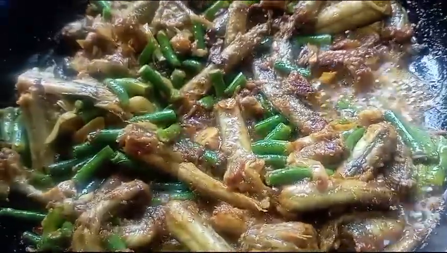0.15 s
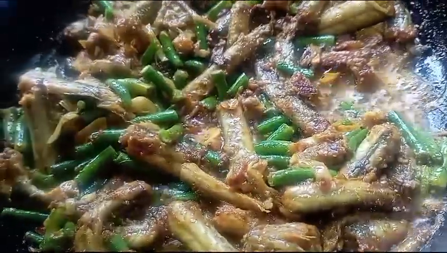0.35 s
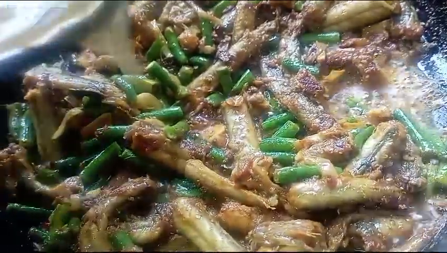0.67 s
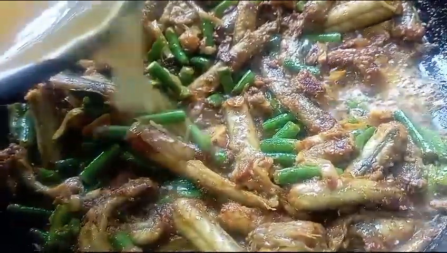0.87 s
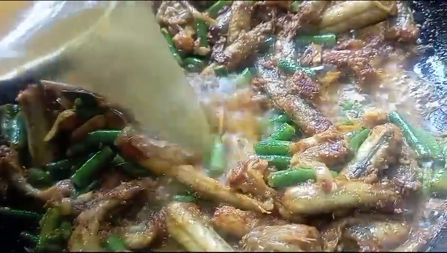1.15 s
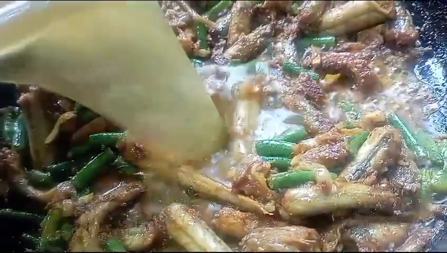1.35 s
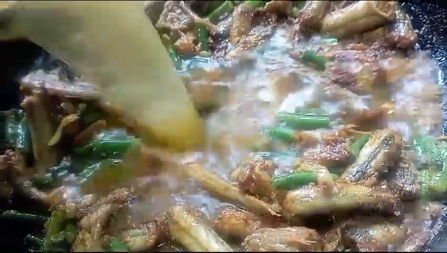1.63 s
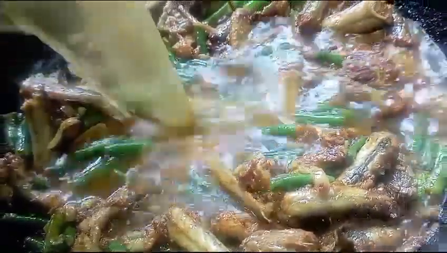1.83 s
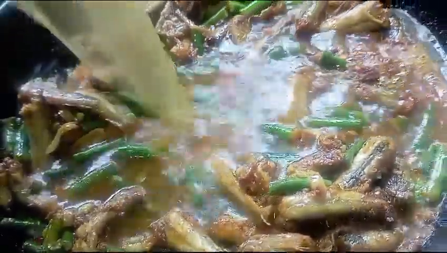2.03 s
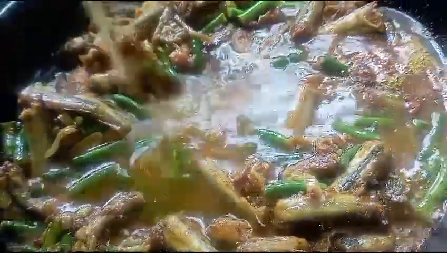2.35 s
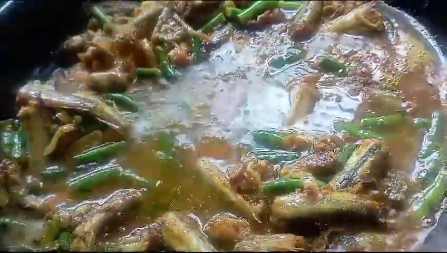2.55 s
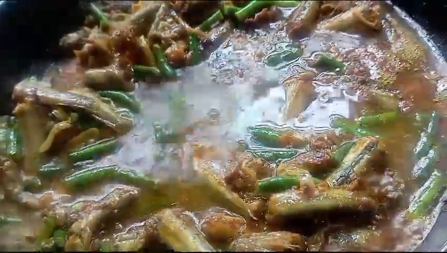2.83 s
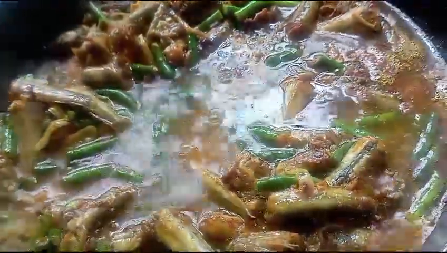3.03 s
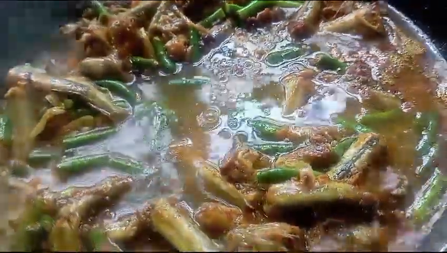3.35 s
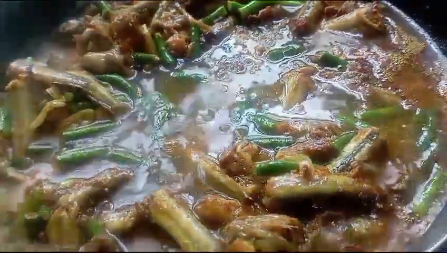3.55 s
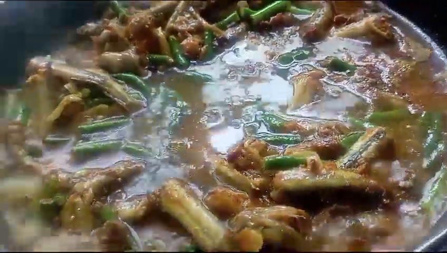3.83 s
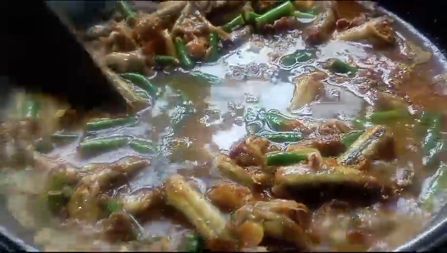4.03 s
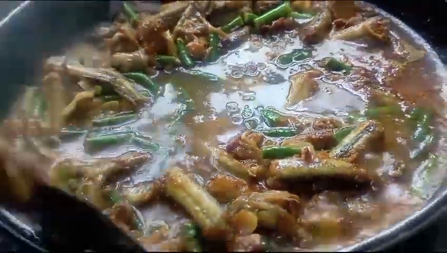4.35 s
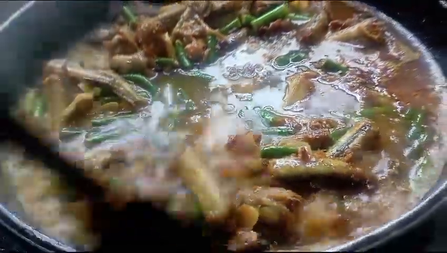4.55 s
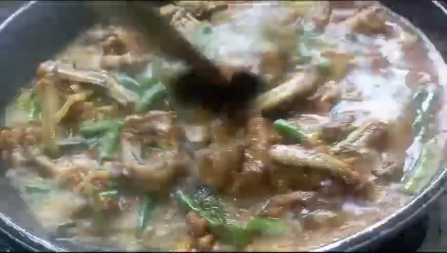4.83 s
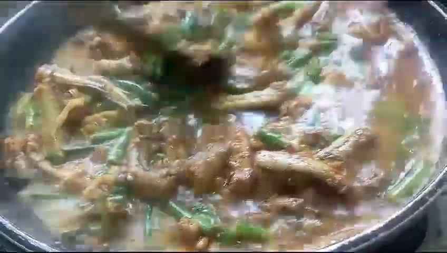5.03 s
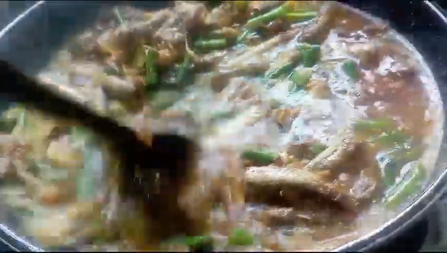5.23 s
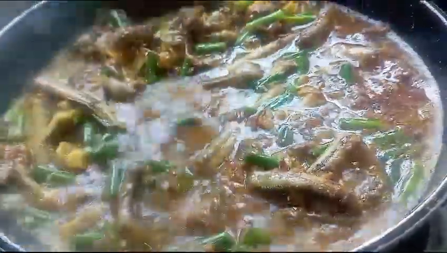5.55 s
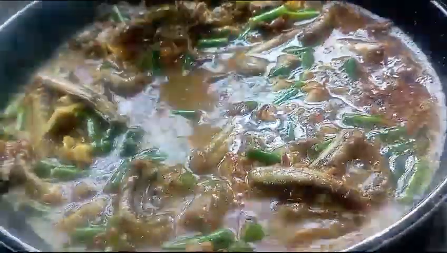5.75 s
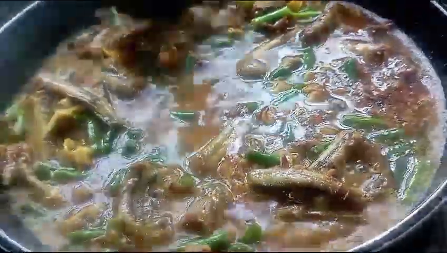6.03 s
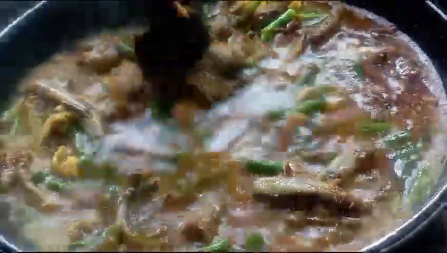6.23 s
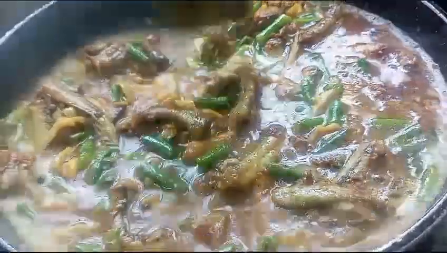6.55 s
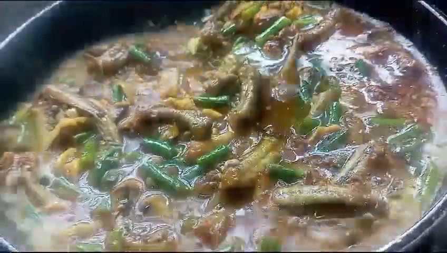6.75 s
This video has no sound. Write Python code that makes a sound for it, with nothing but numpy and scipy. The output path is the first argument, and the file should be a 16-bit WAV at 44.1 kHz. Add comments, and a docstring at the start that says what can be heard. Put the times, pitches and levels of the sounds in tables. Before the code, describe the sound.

Sparse sharp crackles of hot fat in a pan, then poured liquid erupts into a dense, bright sizzle with thumping splatters and light spatula bumps.

```python
"""A kitchen stove, with a two-port microphone just above a pan in which fish curry fries.
Sparse crackling in hot fat swells to a dense sizzle of random bubble bursts when liquid is poured in.
Flying droplets strike the nearer left port, which faces the pan and is brightest near 10 kHz; the right
port faces away and is strongest around 3-4 kHz. Sauce simmers and air in the pan rings, both driven by bursts.
Later a spatula drags over the pan in stick-slip bumps; filtered noise makes the burner rumble below."""
import sys
import numpy as np
from scipy import signal
from scipy.fft import rfft, irfft
from scipy.io import wavfile

SR = 44100
rng = np.random.default_rng(int(sys.argv[2]) if len(sys.argv) > 2 else 0)


def generate_wav(signal):
    """Clip the signal to [-1, 1] and save it as 16-bit WAV at the path in sys.argv[1]."""
    frames = np.transpose(np.atleast_2d(signal))
    scaled = np.clip(frames, -1, 1) * 32767
    pcm = np.round(scaled).astype(np.int16)
    wavfile.write(sys.argv[1], SR, pcm)


N = 303829
TIME = np.arange(N) / SR


def from_db(db):
    """Decibels to amplitude gain."""
    return 10 ** (np.asarray(db) / 20)


def rms_one(x):
    """Scale to unit rms."""
    return x / np.sqrt(np.mean(x ** 2) + 1e-20)


def in_time(rows):
    """Interpolate each column of a curve at every sample."""
    seconds, *columns = np.transpose(rows)
    return [np.interp(TIME, seconds, column) for column in columns]


def cut(x, hz, kind, order=2):
    """Butterworth low- or high-pass."""
    sos = signal.butter(order, min(hz, .45 * SR), kind, fs=SR, output="sos")
    return signal.sosfilt(sos, x + 1e-18)


def drift(rate_hz):
    """Slow random wander of spread 1: noise through two equal poles, made at every 40th sample."""
    step = 40
    r = np.exp(-2 * np.pi * rate_hz * step / SR)
    noise = rng.standard_normal(N // step + 2002)
    slow = signal.lfilter([1], [1, -2 * r, r * r], noise)[2000:]   # drop the filter's start
    return np.interp(np.arange(N) / step, np.arange(len(slow)), rms_one(slow))


def convolve(x, response):
    """Pass a sound through an impulse response."""
    return signal.oaconvolve(x, response)[:N]


def colour(x, spectrum, size=4096):
    """Causal (minimum-phase) filter that follows a spectrum of (Hz, dB) rows."""
    hz, db = np.transpose(spectrum)
    log_bins = np.log(np.fft.rfftfreq(size, 1 / SR) + 1)
    log_gain = np.log(from_db(np.interp(log_bins, np.log(hz), db)))
    # folding the cepstrum onto positive times gives minimum phase
    cepstrum = irfft(log_gain)[:size // 2]
    cepstrum[1:] *= 2
    return convolve(x, irfft(np.exp(rfft(cepstrum, size))))


def clicks(rows):
    """One single-sample click for each (seconds, dB) row."""
    out = np.zeros(N)
    for s, db in rows:
        out[round(s * SR)] += from_db(db)
    return out


def echoes(x, t60):
    """Dense reflections with the energy of the sound itself: noise under its decaying energy."""
    keep = from_db(-120 / (t60 * SR))
    energy = signal.lfilter([0, 1 - keep], [1, -keep], x ** 2 + 1e-18)
    return np.sqrt(energy) * rng.standard_normal(N)


def paths(x, left_wall_db, left_room_db, right_direct_db, right_wall_db, right_room_db, lag_s=.00036):
    """The left port hears bursts directly; the right a little later, mostly by way of pan wall and kitchen."""
    kitchen_t60 = 0.21
    left = x + from_db(left_wall_db) * echoes(x, t60=.005)
    left = left + from_db(left_room_db) * echoes(x, kitchen_t60)
    late = np.interp(TIME - lag_s, TIME, x)
    right = from_db(right_direct_db) * late + from_db(right_wall_db) * echoes(late, t60=0.0096)
    right = right + from_db(right_room_db) * echoes(late, kitchen_t60)
    return np.array([left, right])


# Colour of the port that faces the pan. Each row: frequency in Hz, gain in dB.
LEFT_PORT_COLOUR = [(900, -46.5), (1300, -19.5), (1600, -19), (2300, -13.5), (3000, -14.6), (4100, -11),
                    (5500, -11), (7000, -9), (8500, -4.5), (9400, -0.5), (10100, 1.7), (11000, -1.5),
                    (12000, -4.5), (13500, -8.5), (15500, -11)]
# Colour of the port that faces away. Each row: frequency in Hz, gain in dB.
RIGHT_PORT_COLOUR = [(900, -29.5), (1300, -23.2), (1550, -25.5), (1900, -16.5), (2200, -15.5),
                     (2450, -11.5), (2750, -2), (3300, -3), (3650, -3.5), (3950, -5), (4400, -2.5),
                     (5200, -5), (6000, -7), (9500, -16), (15500, -18.5)]


def ports(both):
    """Each microphone port adds its own resonances."""
    return np.array([colour(both[0], LEFT_PORT_COLOUR), colour(both[1], RIGHT_PORT_COLOUR)])


def pair(make, likeness, balance_db):
    """Two channels of a diffuse sound that are partly alike, from independent mid and side."""
    alike = np.clip(likeness, -1, 1)
    mid = np.sqrt((1 + alike) / 2) * make()
    side = np.sqrt((1 - alike) / 2) * make()
    return np.array([(mid + side) * from_db(balance_db / 2), (mid - side) * from_db(-balance_db / 2)])


def bursts(per_s, spread_db, clump_db, largest=3.73):
    """Tiny bubbles burst at random, in clumps; most are weak, a few strong."""
    born = rng.random(N) < per_s * from_db(clump_db * drift(25)) / SR
    sizes = from_db(spread_db * np.minimum(rng.exponential(1, N), largest))
    signs = rng.choice([-1, 1], N)
    # dividing by the rate keeps the power even while the rate changes
    return rms_one(born * sizes * signs / np.sqrt(per_s))


# Moment the liquid reaches the hot metal, and time constant of its spreading, in seconds.
POUR_S, SPREAD_S = 1.965, .42


def since_pour():
    """Seconds since the liquid reached the metal; zero before."""
    return np.maximum(TIME - POUR_S, 0)


def wetted(rise_s):
    """Share, from 0 to 1, that builds up exponentially after the pour."""
    return 1 - np.exp(-since_pour() / rise_s)


def blend_db(dry_db, wet_db, rise_s):
    """The power of the wetted pan takes over from that of the dry pan."""
    share = wetted(rise_s)
    power = (1 - share) * from_db(dry_db) ** 2 + share * from_db(wet_db) ** 2
    return 10 * np.log10(power)


# The wetted metal fries loudly and cools slowly; levels here are relative.
FRY_DB, COOLING_DB_PER_S = -33.5, .27
# The first liquid flashes to steam: extra fizz that settles.
FIZZ_DB, FLASH_DB, FLASH_S = -33.3, 9.7, 1.6
# Time constants of the build-up: fizz grows faster than frying.
FRY_RISE_S, FIZZ_RISE_S = .34, .28
# Close over the pan before the liquid spreads. Each row: time in seconds, then relative levels in dB of
# the frying, the fine fizz and the simmer.
DRY_PAN_LEVELS = [(0, -41.5, -37, -60), (0.55, -42.6, -41.5, -60.6), (1.17, -44.2, -43.3, -59.3),
                  (1.8, -43, -36.7, -56.8)]
# Sauce washes over bare metal and the sizzle swells. Each row: centre in seconds, half width in seconds,
# added frying in dB, added fizz in dB.
SIZZLE_SURGES = [(2.055, .04, 2.6, .8), (2.32, .06, .3, 1.5), (3.65, .2, .3, 2.3), (5.3, .35, -.2, 3.1),
                 (6.55, .1, .3, 1)]


def heat():
    """Levels of frying and fizz: both leap at the pour, then settle, and change with each surge."""
    dry_fry_db, dry_fizz_db, _ = in_time(DRY_PAN_LEVELS)
    wet_fry_db = FRY_DB - COOLING_DB_PER_S * since_pour()
    wet_fizz_db = FIZZ_DB + FLASH_DB * np.exp(-since_pour() / FLASH_S)
    fry_db = blend_db(dry_fry_db, wet_fry_db, FRY_RISE_S)
    fizz_db = blend_db(dry_fizz_db, wet_fizz_db, FIZZ_RISE_S)
    for s, width_s, more_fry_db, more_fizz_db in SIZZLE_SURGES:
        swell = np.exp(-((TIME - s) / width_s) ** 2)
        fry_db = fry_db + more_fry_db * swell
        fizz_db = fizz_db + more_fizz_db * swell
    return fry_db, fizz_db


# Base burst rates in the dry pan and under liquid, which each source scales; relative level of the sauce.
DRY_RATE, WET_RATE, WET_SIMMER_DB = 600, 8200, -48.9
# Pitch of the commonest bubbles in fat, fresh liquid and heated sauce; time constant of heating through.
FAT_HZ, FRESH_HZ, HEATED_HZ, HEATING_S = 4400, 5600, 2500, 2.1


def liquid():
    """Burst rate, simmer level and bubble pitch: bubbles multiply as liquid spreads and grow as it heats."""
    per_s = DRY_RATE + (WET_RATE - DRY_RATE) * wetted(SPREAD_S)
    *_, dry_simmer_db = in_time(DRY_PAN_LEVELS)
    wet_simmer_db = WET_SIMMER_DB - COOLING_DB_PER_S * since_pour()
    simmer_db = blend_db(dry_simmer_db, wet_simmer_db, SPREAD_S)
    sauce_hz = HEATED_HZ + (FRESH_HZ - HEATED_HZ) * np.exp(-since_pour() / HEATING_S)
    return per_s, simmer_db, np.where(TIME < POUR_S, FAT_HZ, sauce_hz)


# The burner below the pan, as it reaches the microphone. Each row: frequency in Hz, relative level in dB.
BURNER_COLOUR = [(25, -42), (50, -27), (75, -23), (98, -3.5), (118, -12.5), (140, 3), (165, -7.5),
                 (188, 0.5), (225, -8), (300, -7.5), (420, -20.5), (900, -17), (2000, -35)]


def burner():
    """Steady rumble of the stove: low coloured noise, nearly alike at both ports."""
    def rumble():
        return rms_one(colour(rng.standard_normal(N), BURNER_COLOUR))
    return from_db(-55.5) * pair(rumble, likeness=0.97, balance_db=-.3)


# The body of the sauce, heard from above. Each row: frequency in Hz, relative level in dB.
SIMMER_COLOUR = [(90, -22.5), (170, -5), (260, -0.5), (370, -3), (490, 3), (650, -3), (850, 0.5), (950, -9),
                 (1250, -10.5), (1600, -7), (2600, -39)]


def simmer(per_s, simmer_db):
    """Soft, low bursts in the body of the sauce."""
    def blips():
        return rms_one(colour(bursts(per_s / 2, spread_db=2.5, clump_db=2.5), SIMMER_COLOUR))
    return from_db(simmer_db) * pair(blips, likeness=0.53, balance_db=2.5)


# The air held in the pan, under the microphone. Each row: frequency in Hz, bandwidth in Hz, relative level in dB.
PAN_AIR_MODES = [(1055, 120, -8), (1495, 97, -6), (1913, 190, -2), (2624, 130, 0.5), (3007, 75, -1),
                 (3550, 70, -7.5), (4380, 160, -1)]


def pan_air(per_s, fry_db):
    """Bursts set the air in the pan ringing; the two ports lie on opposite sides of its swing."""
    ringing = 0
    for hz, width_hz, db in PAN_AIR_MODES:
        r = np.exp(-np.pi * width_hz / SR)
        resonator = [1, -2 * r * np.cos(2 * np.pi * hz / SR), r * r]
        drive = bursts(per_s * 2, spread_db=4.0, clump_db=2.0)
        ringing = ringing + from_db(db) * rms_one(signal.lfilter([1, 0, -1], resonator, drive))
    ringing = ringing * from_db(fry_db - 13.5)
    return np.array([-.9 * cut(ringing, 2920, "low"), ringing])


# While the spatula drags, it sticks and slips at this interval, with this random spread.
SLIP_S, SLIP_JITTER_S = .0172, .0012
# The spatula drags over the pan under the sauce. Each row: start in seconds, relative level in dB,
# length in seconds.
SPATULA_DRAGS = [(4.847, -33, .01), (6.019, -29.5, .075), (6.136, -33, .01), (6.2, -39, .14)]
# The loaded pan, struck from inside. Each row: frequency in Hz, relative level in dB, 60 dB decay in seconds.
LOADED_PAN_MODES = [(236, -7, .05), (340, -11, .04), (488, -7, 0.074), (564, -7, 0.075), (650, -9, .045),
                    (730, -5, 0.03)]


def spatula():
    """Every slip bumps the damped pan and rings each mode with a strength of its own."""
    bumps = []
    for s, db, length_s in SPATULA_DRAGS:
        for delay in np.arange(0, length_s, SLIP_S):
            bumps.append((s + delay + rng.normal(0, SLIP_JITTER_S), db))
    out = np.zeros(N)
    for k, (hz, db, t60) in enumerate(LOADED_PAN_MODES):
        t = TIME[:int(t60 * SR)]
        blows = clicks([(s, level + rng.normal(0, 1.7)) for s, level in bumps])
        ring = from_db(db - 60 * t / t60) * np.sin(2 * np.pi * hz * t)
        out += convolve(blows, (-1) ** k * ring)   # neighbouring modes start in opposite directions
    return from_db([[-4], [-8]]) * cut(out, 200, "high")


# Fine drops fly at the pour and die down.
MIST_DB, MIST_FADE_DB_PER_S = -45, 4.8


def mist(mist_db):
    """Much smaller drops patter on the left port as low, random taps."""
    taps = bursts(90., spread_db=3.0, clump_db=2.0, largest=3.0)
    patter = cut(cut(taps, 67, "high", order=3), 330, "low", order=1)
    return np.array([rms_one(patter) * from_db(mist_db), np.zeros(N)])


# Droplets that strike the left port. Each row: start in seconds, thump peak in dB, push time in seconds,
# relative splash level in dB.
PORT_DROPLETS = [(2.0884, -24.5, .0003, -15), (2.148, -22.5, .00018, -2.5), (2.2133, -23, .0002, -6),
                 (2.2764, -21, .00016, -8), (2.3116, -10, .00066, -10), (2.3703, -25, .00018, -13),
                 (2.4558, -4.1, .00096, -18), (2.592, -26.5, .00026, -18), (2.8762, -21, .00046, -16),
                 (2.9077, -8.3, .0013, -20)]


def droplets():
    """Each drop pushes air into the port; the bass roll-off turns the push into a short swinging thump."""
    thumps = np.zeros(N)
    t = TIME[:SR // 10]
    for s, thump_db, push_s, _ in PORT_DROPLETS:
        push = cut(t / push_s * np.exp(-t / push_s), 78, "high", order=3)
        start = round(s * SR)
        thumps[start:start + len(t)] += from_db(thump_db) * push / np.abs(push).max()
    hits = clicks([(s, splash_db) for s, _, _, splash_db in PORT_DROPLETS])
    tick = cut(cut(hits, 660, "high"), 1900, "low") * from_db(3)   # the drop flattens on the casing
    splash = hits + 0.94 * echoes(hits, t60=0.0061)
    splash = colour(splash, LEFT_PORT_COLOUR) * from_db(12)
    return np.array([thumps + tick + splash, from_db(-45) * thumps])


# Sprays of fat that reach both ports. Each row: start in seconds, relative level in dB,
# decay time constant in seconds.
FAT_SPRAYS = [(.453, -20, 0.0016), (1.619, -28, 0.0025), (2.909, -5.5, 0.002)]


def sprays():
    """A big bubble throws a brief shower of fat: noise that starts at once and decays."""
    shower = np.zeros(N)
    for s, db, decay_s in FAT_SPRAYS:
        shower += from_db(db) * (TIME >= s) * np.exp(-np.abs(TIME - s) / decay_s)
    hiss = cut(shower * rng.standard_normal((2, N)), 4800, "high", order=1)
    return from_db([[5], [12]]) * ports(hiss)


# Lesser snaps come at random and thin out as liquid covers the fat; levels are relative.
SNAPS_PER_S, SNAP_DB, SNAP_SPREAD_DB = 9, -16, 2.5
# Loud snaps of fat, close to the left port. Each row: start in seconds, relative level in dB.
LOUD_SNAPS = [(0.024, -3), (0.1835, -7.5), (0.2315, -8), (0.4403, -5.5), (0.453, -8), (0.5648, -8.5),
              (0.7716, -13), (1.1058, -11), (1.3282, -12.5), (1.5054, -6.5), (1.6192, -8), (1.7955, -5.5),
              (2.2137, -2), (3.7262, 1)]


def snaps():
    """Single drops of water explode in the fat, as clicks close to the left port."""
    born = rng.random(N) < SNAPS_PER_S * (1 - wetted(SPREAD_S)) / SR
    lesser = born * from_db(SNAP_DB + SNAP_SPREAD_DB * rng.standard_normal(N))
    cracks = paths(clicks(LOUD_SNAPS) + lesser, left_wall_db=-8, left_room_db=-15,
                   right_direct_db=-8, right_wall_db=-5, right_room_db=-12)
    return from_db(11) * ports(cut(cracks, 6300, "high"))


# Bursting bubbles in the pan, sorted by pitch. Each entry: the bound between two pitch classes in Hz.
BUBBLE_CLASS_BOUNDS = [800, 2400, 3200, 4100, 5300, 7000, 9200, 11800, 18000]


def sizzle(per_s, fry_db, fizz_db, bubble_hz, split_hz=6500, octaves=0.32):
    """Bubbles of many sizes burst on the hot metal: large ones fry low, the finest fizz on top."""
    out = 0
    cracks = bursts(per_s / 2, spread_db=4.4, clump_db=2.5)
    spurts_db = 0.63 * drift(14.5)   # steam escapes unevenly
    for low, high in zip(BUBBLE_CLASS_BOUNDS, BUBBLE_CLASS_BOUNDS[1:]):
        hz = np.sqrt(low * high)
        fine = 1 / (1 + (split_hz / hz) ** 5)   # share of fizz: fewer bursts, more unequal
        own = bursts(per_s * from_db(3 - 8 * fine), spread_db=3.5 + fine, clump_db=1.8)
        pops = rms_one(own + .75 * cracks)   # the sharpest cracks sound in every class
        level_db = (1 - fine) * (fry_db + 15.5) + fine * (fizz_db + 12)
        both = paths(pops * from_db(level_db + spurts_db), left_wall_db=-4, left_room_db=-5,
                     right_direct_db=-14, right_wall_db=-1.5, right_room_db=-4)
        band = cut(cut(both, low, "high", order=4), high, "low", order=4)
        # classes near the commonest bubble pitch are lifted, more so at the right port
        common = np.exp(-(np.log2(hz / bubble_hz) / octaves) ** 2)
        out = out + band * from_db(np.array([[1.0], [3.5]]) * common)
    return ports(out)


def scene():
    """Everything on the stove, from the burner up to the sizzle."""
    fry_db, fizz_db = heat()
    per_s, simmer_db, bubble_hz = liquid()
    background = burner() + simmer(per_s, simmer_db) + pan_air(per_s, fry_db) + spatula()
    mist_db = MIST_DB - MIST_FADE_DB_PER_S * since_pour()
    spatter = wetted(rise_s=.08) * mist(mist_db) + droplets()
    fat = sprays() + snaps() + sizzle(per_s, fry_db, fizz_db, bubble_hz)
    return background + spatter + fat


CUTOFF_HZ = 15800


def record(dry):
    """The largest peaks are rounded and the top of the treble is cut steeply."""
    rounded = dry / (1 + (dry / .82) ** 4) ** (1 / 4)
    steep = signal.ellip(12, .1, 80, CUTOFF_HZ, fs=SR, output="sos")
    return signal.sosfilt(steep, rounded)


dry = scene()
out = record(dry)
generate_wav(out)
```